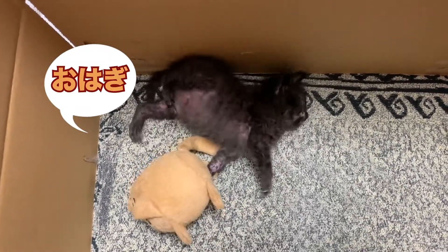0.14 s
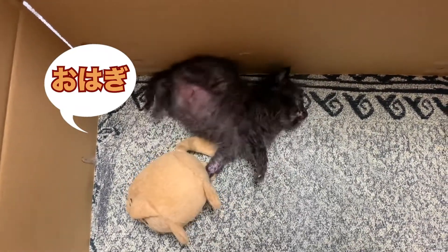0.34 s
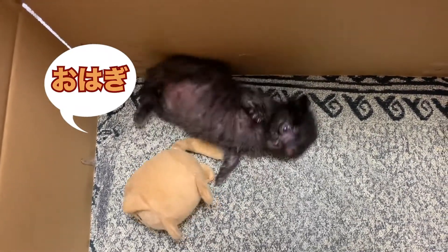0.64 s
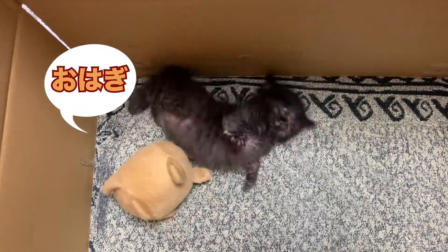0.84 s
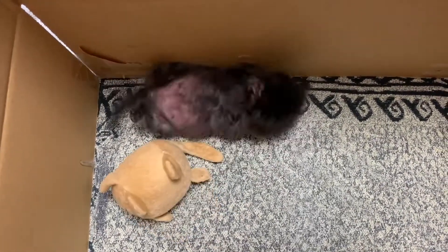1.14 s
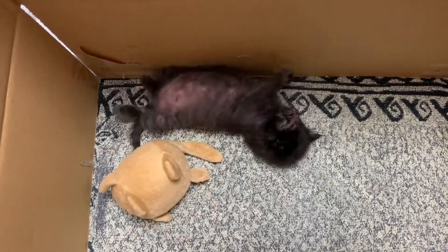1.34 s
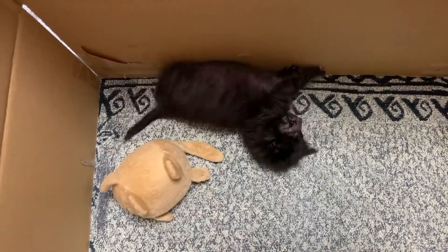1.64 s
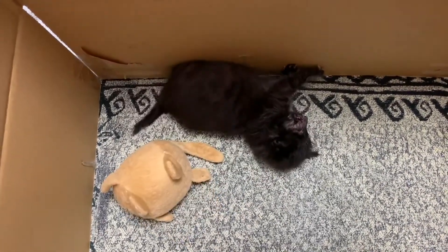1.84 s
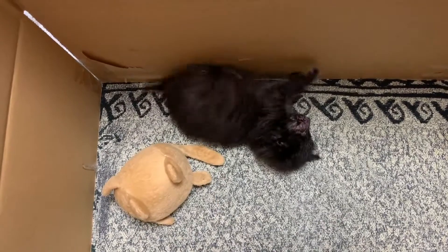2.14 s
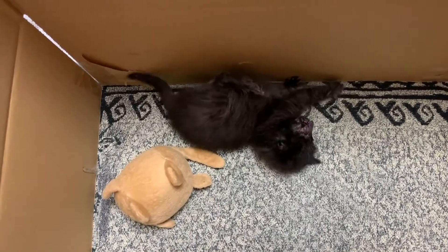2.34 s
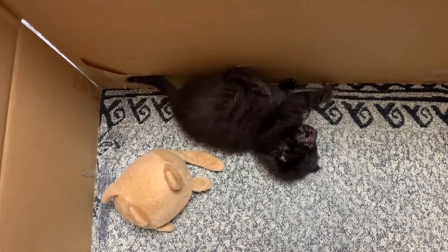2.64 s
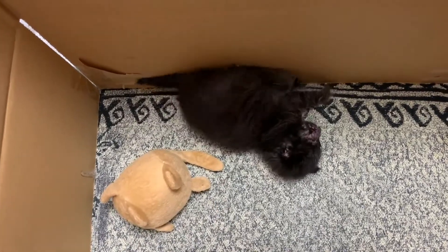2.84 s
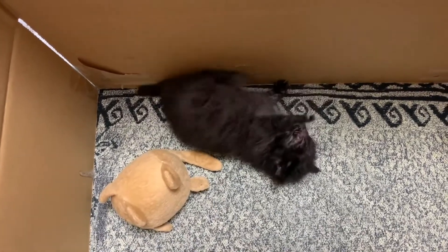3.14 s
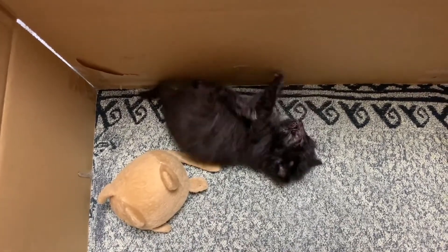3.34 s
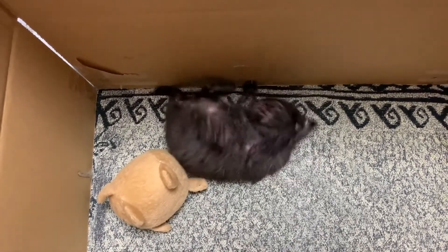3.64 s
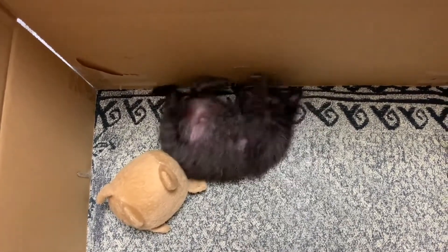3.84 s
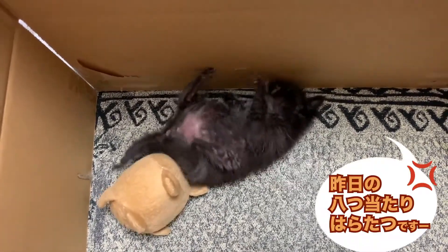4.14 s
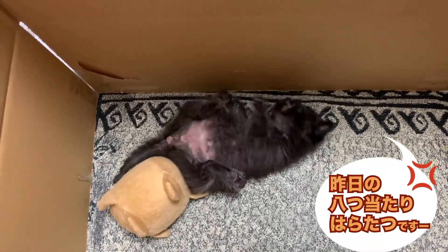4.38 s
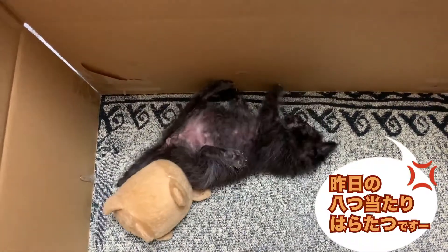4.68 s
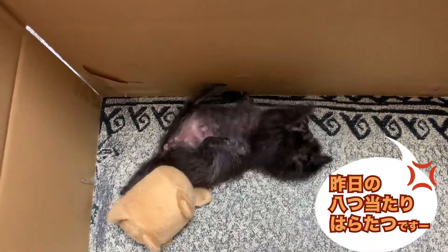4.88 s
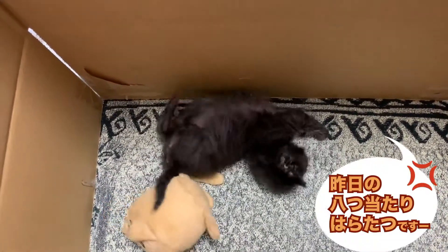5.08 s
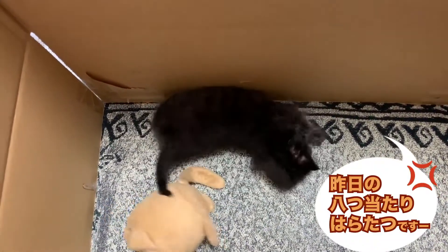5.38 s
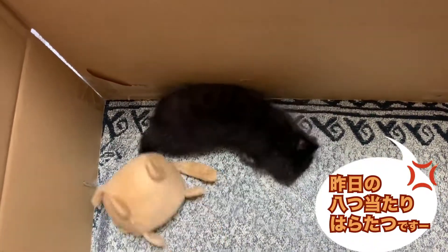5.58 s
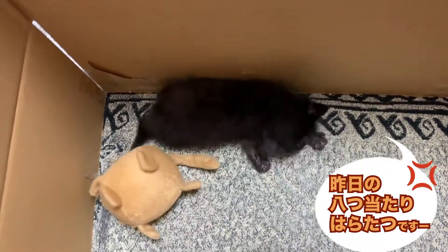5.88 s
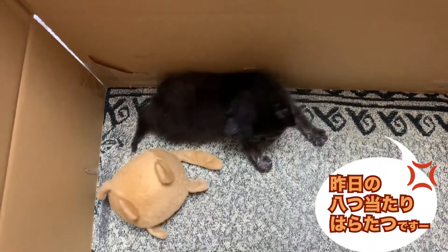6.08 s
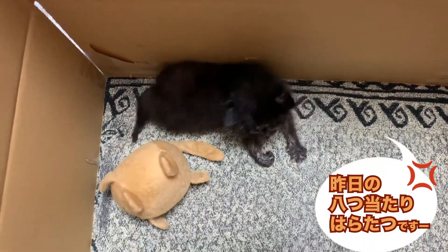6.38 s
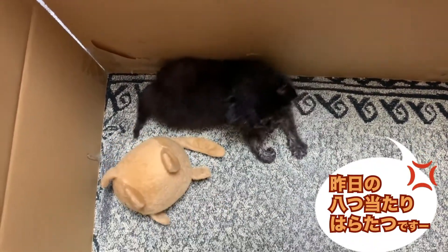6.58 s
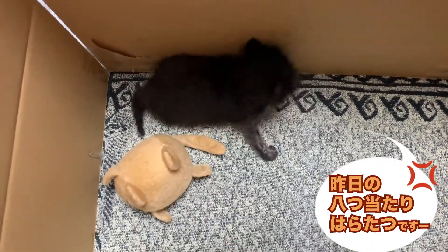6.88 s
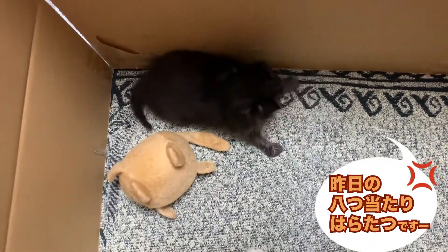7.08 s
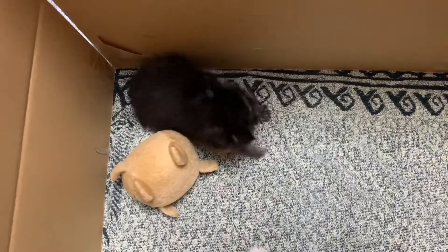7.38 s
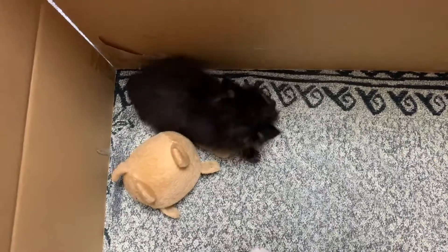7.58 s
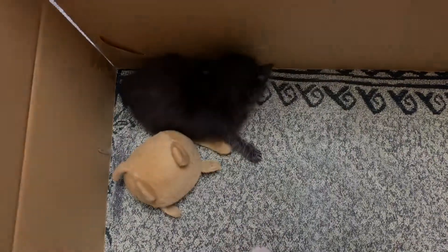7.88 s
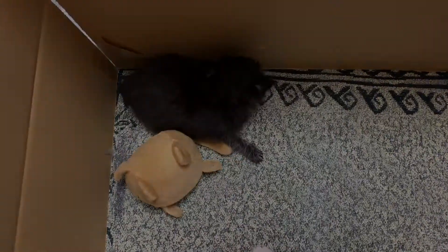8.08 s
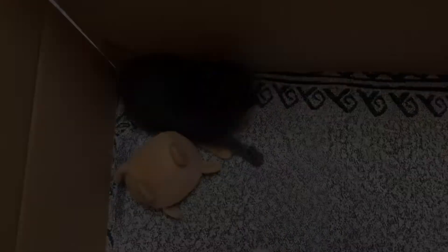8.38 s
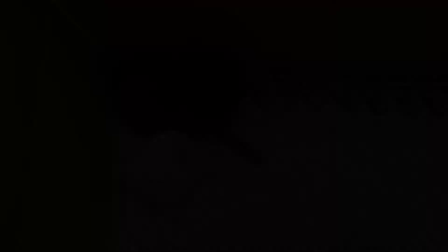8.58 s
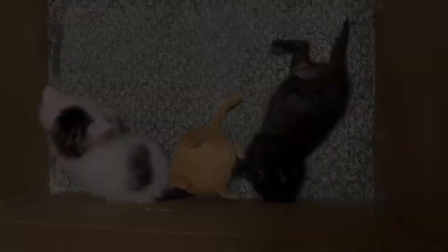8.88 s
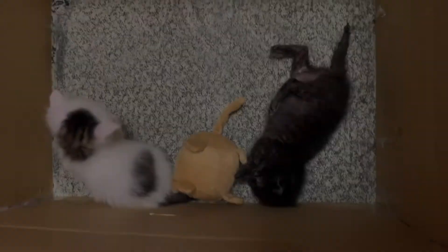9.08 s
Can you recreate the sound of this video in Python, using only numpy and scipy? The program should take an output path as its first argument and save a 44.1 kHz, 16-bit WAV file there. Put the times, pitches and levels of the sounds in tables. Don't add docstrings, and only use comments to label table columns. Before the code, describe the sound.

Two early claw snaps and a cardboard thump lead into rapid scratching and brushing, a pause, then another flurry. A sharp knock follows, then looser rolling rustles, small clicks, papery creaks and one deep floor thud. The movement fades, cuts out for a moment and returns as near-quiet. Heard close from above by a phone, indoors, over low room rumble.

```python
import sys
import numpy as np
from scipy import signal
from scipy.io import wavfile
from scipy.ndimage import uniform_filter1d

SR = 44100
rng = np.random.default_rng(int(sys.argv[2]) if len(sys.argv) > 2 else 0)


def boost_factor(decibels):
    exponent = np.asarray(decibels, float) / 20
    return 10 ** exponent


def to_wav(s):
    ch = np.atleast_2d(s).T
    pcm = np.round(np.clip(ch, -1, 1) * 32767)
    wavfile.write(sys.argv[1], SR, pcm.astype(np.int16))


N = 406643
T = np.arange(N) / SR
HZ = np.arange(513) * SR / 1024
SILENCE_START_S, SILENCE_END_S = 8.659, 8.72

# pitch in Hz, width in Hz, level in dB.
WALL = [(476, 13, -9), (565.3, 40, 8), (838, 170, -5.5), (1170, 22, 1), (1360, 97, -4.5), (1620, 140, -4.5),
        (1774, 220, -3), (2400, 670, -10), (3590, 230, -11)]
# pitch in Hz, width in Hz, level in dB.
PILE = [(3280, 750, -5.5), (4360, 610, -2), (6250, 1290, 0.5), (9100, 1830, -0.5), (11840, 7140, -2.5),
        (14230, 7500, -5)]


def unit(x):
    return x / np.sqrt(np.mean(x ** 2))


def level_curve(table):
    s, db = np.transpose(table)
    return boost_factor(np.interp(T, s, db))


def band(x, lo_hz, hi_hz):
    return signal.sosfilt(signal.butter(2, [lo_hz, hi_hz], "band", fs=SR, output="sos"), x)


def walk(rate):
    hold = int(SR / rate)
    steps = np.repeat(rng.standard_normal(N // hold + 1), hold)
    return 0.98 * uniform_filter1d(steps, hold)[:N]


def resonate(x, modes, patchy_db=None):
    out = 0
    for k, (hz, width, db) in enumerate(modes):
        if patchy_db is not None:
            db = db + patchy_db * walk(17)
        ring = signal.lfilter(*signal.iirpeak(hz, hz / width, fs=SR), x)
        out = out + (-1) ** k * boost_factor(db) * ring
    return out


def add(out, s, sound):
    i = int(s * SR)
    out[i:i + len(sound)] += sound[:N - i]


def rumble():
    # time in seconds, rumble in dB.
    weight = [(0, -58), (.38, -69.5), (.77, -61.5), (1.1, -62), (1.23, -55.5), (1.56, -58), (2.64, -59.5),
              (3.03, -52.5), (3.21, -59.5), (4.55, -61), (4.78, -50), (4.93, -60.5), (5.57, -56),
              (6.06, -62), (6.98, -52.5), (7.45, -59.5), (8.4, -63), (9.22, -61.5)]
    noise = rng.standard_normal((2, N))
    floor = unit(band(band(noise[0], 25, 120), 6.6, 110))
    hum = unit(band(noise[1], 82.3, 105.3))
    return boost_factor(-0.5 + 2.0 * walk(9)) * level_curve(weight) * (floor + boost_factor(-3.5) * hum)


def room():
    # pitch in Hz, level in dB per Hz.
    air_colour = [(150, -8.5), (240, -20), (420, -18), (620, -36.5), (1000, -27), (2000, -42), (4500, -41),
                  (15500, -44)]
    hz, db = np.transpose(air_colour)
    colour = boost_factor(np.interp(np.log(HZ + 1), np.log(hz), db)) * np.clip(HZ / 150, 0, 1) ** 2
    air = signal.fftconvolve(rng.standard_normal(N), signal.firwin2(1023, HZ, colour, fs=SR), "same")
    return boost_factor(-70) * unit(air) * boost_factor(0.27 * walk(15.0))


def strokes(table):
    edge_db, rise_share = 24.5, 0.44
    rise_curve, stop_curve = 1.82, 1.98
    t = T[::44]
    power = boost_factor(-88) ** 2
    for s, length, *db in table:
        rising = t < s
        away = np.where(rising, (s - t) / rise_share, (t - s) / (1 - rise_share)) / length
        firm = boost_factor(-edge_db * np.minimum(away, 5) ** np.where(rising, rise_curve, stop_curve))
        brush = boost_factor(-13.5 - 11 * away)
        shape = firm ** 2 + brush ** 2
        power = power + boost_factor(np.array(db)[:, None]) ** 2 * shape * (t < SILENCE_END_S)
    return [np.interp(T, t, p) for p in np.sqrt(power)]


def slips(spread_db, judder_db, rate):
    uneven_db = spread_db * rng.exponential(size=N)
    return rng.standard_normal(N) * boost_factor(uneven_db + judder_db * walk(rate))


def dragging():
    # middle in seconds, length in seconds, fur on pile in dB, claws on cardboard in dB.
    scrabbles = [(.12, 0.36, -69.5, -66), (.65, 0.78, -71.5, -70), (1.09, 0.26, -65, -66),
                 (1.29, 0.18, -59, -61.5), (1.49, 0.19, -60, -64.5), (1.575, 0.13, -48, -40),
                 (1.6, 0.043, -69, -43.5), (1.71, 0.27, -59, -53), (1.775, 0.095, -42.5, -45),
                 (1.805, 0.063, -48, -40.5), (1.89, 0.075, -53.5, -41.5), (2.06, 0.18, -48.5, -39),
                 (2.12, 0.3, -58, -45), (2.175, 0.079, -52.5, -43), (2.26, 0.058, -50.5, -58),
                 (2.49, 0.17, -70.5, -63.5), (2.71, 0.17, -72, -70.5), (2.8, 0.11, -70.5, -63.5),
                 (2.94, 0.32, -59, -57.5), (3.13, 0.14, -55.5, -59), (3.39, 0.047, -49.5, -42.5),
                 (3.43, 0.097, -56, -55.5), (3.57, 0.33, -58, -59.5), (3.69, 0.1, -51, -55.5),
                 (3.82, 0.53, -67, -66), (3.9, 0.072, -59, -60), (3.948, 0.093, -36.5, -48.5),
                 (3.977, 0.066, -41.5, -51), (4.02, 0.11, -53, -52), (4.085, 0.075, -40.5, -41),
                 (4.12, 0.065, -41.5, -46.5), (4.195, 0.065, -49, -58.5)]
    rolls = [(4.448, .04, -82, -61), (4.497, 0.045, -64, -48.5), (5.536, 0.025, -54, -50),
             (5.681, 0.029, -56, -48), (6.02, 0.042, -49.5, -42), (6.281, .1, -67, -78),
             (6.487, 0.063, -71, -58.5), (4.611, 0.19, -61, -57), (4.714, 0.048, -38, -32.5),
             (4.785, 0.25, -52, -53), (4.855, 0.018, -47, -58), (5.016, 0.22, -49, -58),
             (5.192, 0.25, -67, -64), (5.323, 0.085, -50.5, -60.5), (5.41, 0.49, -63.5, -59.5),
             (5.73, 0.34, -78, -70.5), (6.04, 0.34, -69, -64), (6.328, 0.31, -72, -59.5),
             (6.755, 0.5, -72, -61.5), (6.918, 0.12, -52, -54), (7.021, 0.2, -60, -64),
             (7.11, 0.18, -63, -59.5), (7.246, 0.18, -57, -58), (7.392, 0.15, -69.5, -66.5),
             (7.62, 0.091, -76.5, -99), (7.879, .015, -54, -56.5), (7.909, 0.092, -70, -68),
             (8.034, 0.13, -70, -67.5), (8.231, 0.11, -71, -68), (8.5, 0.54, -70.5, -70)]
    # middle in seconds, length in seconds, shudder in dB.
    leans = [(1.23, 0.13, -50), (1.32, 0.11, -54), (1.53, 0.21, -53), (2.35, 0.3, -59.5),
             (2.88, 0.49, -55.5), (3.14, 0.13, -55), (3.42, 0.12, -49), (4.15, 0.31, -56), (4.6, 0.72, -60),
             (4.77, 0.23, -47), (5.42, .3, -59), (5.74, 0.21, -63), (6.06, 0.36, -60), (6.52, 0.92, -55),
             (6.72, 0.23, -52), (6.93, 0.12, -50.5), (7.29, 0.2, -51.5), (7.45, 0.15, -60),
             (8.1, 0.4, -70.5), (8.5, 0.21, -64)]
    # time in seconds, level in dB.
    sheen = [(0, 5), (1.3, 5.5), (2.05, 0), (2.6, 3), (3.6, 3.5), (4.2, -1), (4.65, -0.5), (5.1, 4.5),
             (5.5, 1.5), (5.72, -6.5), (6.3, -5), (6.78, -9.5), (6.84, 3.5), (7.2, 2.5), (7.5, -4.5),
             (7.84, -5), (7.9, 6), (8.6, 1)]
    fur, claws = strokes(scrabbles + rolls)
    lean = strokes(leans)[0]

    rasp = resonate(slips(spread_db=3.2, judder_db=2.8, rate=130), WALL[2:], patchy_db=2.0)
    fibres = slips(spread_db=1.6, judder_db=2.8, rate=120)
    hiss = resonate(fibres, PILE[:4], patchy_db=3.0)
    hiss = hiss + level_curve(sheen) * resonate(fibres, PILE[4:], patchy_db=2.3)

    shaking = slips(spread_db=2.0, judder_db=5.0, rate=39)
    ring = np.hypot(boost_factor(-27.5) * lean, boost_factor(-13) * claws) * unit(resonate(shaking, WALL[:2]))
    shudder = np.hypot(lean, boost_factor(-3.5) * claws) * unit(band(shaking, 150, 470))
    return boost_factor(-3.0) * claws * unit(rasp) + boost_factor(3.5) * fur * unit(hiss) + boost_factor(-4.5) * shudder + ring


def creaks():
    # start in seconds, end in seconds, pitch in Hz, width in Hz, level in dB.
    rubs = [
        (0.41, 0.47, 920, 77, -60.5),
        (1.4, 1.41, 950, 120, -65.5),
        (2.8, 2.93, 680, 120, -65),
        (6.4, 6.616, 920, 200, -57),
        (5.66, 5.74, 980, 250, -64.5),
        (4.35, 4.907, 820, 230, -66.5),
        (6.603, 6.785, 815, 560, -52.5),
        (8.6, 8.8, 1010, 90, -78),
        (8.8, 9.194, 900, 79, -74),
    ]
    out = 0
    for start, end, hz, width, db in rubs:
        swell = np.sin(np.pi * np.clip((T - start) / (end - start), 0, 1))
        out = out + boost_factor(db) * swell * unit(resonate(rng.standard_normal(N), [(hz, width, 0)]))
    return out


def thumps():
    # start in seconds, peak in dB, wall pitch in Hz, decay in seconds, floorboards in dB.
    pushes = [(0.607, -43, 120, 0.056, -64.5), (1.125, -20.5, 168, 0.085, -39),
              (1.14, -30.5, 74, 0.202, -59), (1.186, -29.5, 239.6, 0.13, -52.5),
              (2.225, -27, 162.4, 0.15, -56), (2.846, -30.5, 76, 0.14, -56), (2.932, -23, 57, 0.046, -46.5),
              (3.045, -33, 59.2, 0.11, -53), (3.05, -42, 289.9, 0.11, -67),
              (3.373, -31.5, 117.7, 0.18, -43.5), (4.694, -17, 249, 0.095, -44),
              (4.718, -35, 200, 0.087, -65), (4.762, -34.5, 230, 0.047, -69), (4.801, -39, 118, 0.068, -60),
              (5.392, -29.5, 63.3, 0.099, -47.5), (5.673, -33.5, 86, 0.093, -56.5),
              (5.776, -39.5, 183, 0.059, -63), (6.012, -37, 160, 0.18, -62), (6.818, -37, 283, 0.14, -56),
              (6.842, -38.5, 182, 0.22, -64), (6.904, -9, 54.6, 0.1, -27), (6.961, -35.5, 48, 0.35, -58),
              (7.852, -39.5, 311, 0.12, -47.5), (7.87, -37.5, 70, 0.16, -65.5),
              (8.41, -46.5, 111, 0.09, -87.5), (8.641, -61, 84.4, 0.15, -101),
              (8.887, -46.5, 101, 0.11, -92.5), (9.077, -37.5, 77.5, 0.078, -64),
              (9.206, -28.5, 158, 0.043, -63.5)]
    board_hz, board_t60_s = 27.3, 0.65
    t = T[:SR]
    sway = np.sin(2 * np.pi * board_hz * t) * boost_factor(5.5 - 60 * t / board_t60_s) * (1 - np.exp(-t / 0.01))
    out = np.zeros(N)
    for s, db, hz, t60, board_db in pushes:
        phase = 2 * np.pi * hz * (t + .0042 * (1 - np.exp(-t / .008)))
        quick = 0.67 * np.sin(1.56 * phase) * boost_factor(-60 * t / t60)
        slow = 0.35 * np.sin(.67 * phase) * boost_factor(25 * t / t60)
        fade = boost_factor(db - 2.0 - 60 * t / t60)
        soft_start = np.minimum(t * hz / 0.5, 1) ** 1.34
        panel = (np.sin(phase) + quick + slow) * fade * soft_start
        add(out, s - 0.001, panel + boost_factor(board_db) * sway)
    return out


def tear(t, t60_s, tail_db):
    after = np.maximum(t, 0)
    snap = 0.27 * np.exp(-np.abs(t - .0015) / 0.0015)
    return boost_factor(-60 * after / t60_s) + boost_factor(tail_db - 60 * after / 0.14) + snap


def ticks():
    # time in seconds, # peak in
    # dB, treble in dB against the peak, wall in dB against the peak, loudest ring in Hz.
    catches = [(1.123, -42.5, -29, 14, 1260), (1.179, -14, -7.5, -6, 1273), (1.188, -17, -27, -15, 1470),
               (1.554, -34, -1, -9, 2250), (2.223, -28, -28, 10, 1870), (2.322, -50.5, -2, -29, 2000),
               (2.381, -48, -6, -13, 1790), (2.513, -46, -30, -30, 2650), (2.559, -38.5, -35, -29, 3280),
               (2.661, -47, -15, -32, 2670), (3.044, -39.5, -13, 5, 1920), (3.153, -52, -5, -18, 1740),
               (3.372, -22, -10, 7.5, 1200), (3.677, -32.5, -14, -36, 3500), (3.29, -65.5, -12, 12, 1900),
               (4.176, -49, 4, -10, 3300), (4.073, -36.5, 2.5, -3, 1620), (4.395, -56, -20, -10, 1900),
               (4.49, -41.5, -18, -8, 1430), (4.564, -50.5, 7.5, -16, 1360), (4.693, -20.5, -8, 1.5, 1170),
               (4.851, -45, 2, -34, 1360), (5.398, -45.5, 8, -11, 1900), (5.526, -44, 2, -9, 2010),
               (5.678, -25, 0, -14, 4140), (5.772, -54, -18, 5, 1020)]
    later_catches = [(5.955, -44.5, -15, -21, 1900), (5.969, -41.5, 9, -11, 2970),
                     (6.012, -18.5, -1.5, -11.5, 1510), (6.127, -35.5, -2, -31, 2240),
                     (6.354, -30.5, -5, -22, 1170), (6.412, -23.5, -10.5, -33, 1170),
                     (6.417, -30.5, -17, -19, 1086), (6.428, -36, -26, -4, 1120), (6.451, -25, -7, -23, 2230),
                     (6.456, -22.5, -19, -20, 890), (6.467, -26, -3.5, -11, 1790),
                     (6.602, -30.5, -13, -6.5, 880), (6.69, -47, -6, -12, 2400), (6.725, -44, -12, -5, 1000),
                     (6.898, -42, -8, -3, 1300), (6.816, -41.5, 11, 8.5, 890), (6.839, -46, 7, 14, 1650),
                     (6.907, -36.5, -1.5, 3, 920), (7.056, -53.5, 8.5, 4, 1750), (7.364, -63, 10.5, -5, 1500),
                     (7.853, -35, 3.5, 1.5, 1760), (8.407, -50.5, -24, 8, 960), (8.475, -43, -11, 1.5, 2740),
                     (8.738, -65, -3, -20, 3300), (8.81, -55, -26, -11, 1505), (8.852, -55, -29, -17, 1290),
                     (8.892, -56, -32, -6, 1490), (8.935, -60, -28, 6, 1440), (9.069, -66, -1.5, -10, 1210),
                     (9.173, -65.5, -11, -20, 3500), (9.204, -54.5, -5.5, 24.5, 810)]
    lead_s = .006
    t = T[:SR // 7] - lead_s
    strain = np.where(t < 0, boost_factor(-21 + 2200 * t), np.minimum(0.3 + t / .001, 1))
    out = np.zeros(N)
    for s, db, treble_db, wall_db, hz in catches + later_catches:
        t60 = 0.23 * boost_factor(0.72 * wall_db + 1.14 * db)
        noise = rng.standard_normal((4, len(t)))
        ragged = boost_factor(3.6 * uniform_filter1d(noise[3], size=40) * np.sqrt(40))
        body, treble, low = noise[:3] * ragged * strain
        body = body * tear(t, 2.3 * t60, tail_db=-20.5)
        treble = treble * tear(t, 0.8 * t60, tail_db=-28)
        low = low * tear(t, 1.2 * t60, tail_db=-18)

        ring = boost_factor(9.5) * resonate(body, [(hz, hz / 4, 0)])
        knock = resonate(body, WALL[3:]) + boost_factor(-3.5) * band(body, 890, 2240) + ring
        snap = resonate(treble, PILE[:4]) + boost_factor(0.5) * resonate(treble, PILE[4:])
        wall = band(band(low, 350, 700), 170, 740)
        for part, part_db in ((knock, -2.0), (snap, treble_db + 4.5), (wall, wall_db - 9.5)):
            add(out, s - lead_s, boost_factor(db + part_db) * part / np.abs(part).max())
    return out


def ports(x):
    # pitch in Hz, radians the left port leads, radians it wanders as the source moves.
    port_lead = [(0, 0, 0), (450, -.4, .1), (600, -.2, .4), (720, 2.1, .95), (1050, 1.9, .95),
                 (1250, .4, .6), (2000, .1, .45), (2700, .3, 1), (3100, 1.5, 1), (3800, .8, .6),
                 (5300, 3.14, .45), (7000, 4.85, .1), (22050, 19.8, .1)]
    cells = signal.stft(x, nperseg=1024, noverlap=768)[2]
    hz, lead, wander = np.transpose(port_lead)
    pitch = HZ[:, None]
    high = pitch > 4500
    patches = rng.standard_normal(cells.shape)
    patches = unit(uniform_filter1d(uniform_filter1d(patches, size=6, axis=0), size=16, axis=1))

    treble = np.sum(np.abs(cells[100:]) ** 2, axis=0)
    usual = uniform_filter1d(treble, size=24)
    click = np.clip(treble / usual - 1.6, 0, 1)
    shift = click * np.clip(pitch / 5000 - .4, 0, 1) * np.tanh(3 * patches[200])

    hush = .8 * (treble < np.quantile(treble, .15))
    after_cut = 0.45 * (np.arange(len(treble)) * 256 > SILENCE_END_S * SR)
    stray = np.interp(HZ, hz, wander)[:, None] + (hush + after_cut) * high
    stray = stray * np.where(pitch > 2500, 1 - click, 1)
    half = (np.interp(HZ, hz, lead)[:, None] + shift + stray * patches) / 2

    power = uniform_filter1d(uniform_filter1d(np.abs(cells) ** 2, size=24, axis=0), size=5, axis=1)
    cells = cells * ((pitch < 11500) | (power > boost_factor(-108) ** 2))
    top_db = np.where(treble > 3.5 * usual, -27, -41)
    cells = cells * np.where(pitch > 15750, boost_factor(top_db), 1)

    def drop_faint(gain):
        faint = (np.abs(gain) < .24) & high & (click < .5)
        return np.where(faint, boost_factor(-26.0) * gain, gain)

    mid = cells * drop_faint(np.cos(half))
    side = 1j * cells * drop_faint(np.sin(half))
    return signal.istft(np.array([mid + side, mid - side]), nperseg=1024, noverlap=768)[1][:, :N]


def scene():
    return ports(rumble() + room() + dragging() + creaks() + thumps() + ticks())


def roll_off(x):
    return signal.sosfilt(signal.butter(12, 16820, fs=SR, output="sos"), x)


def record(dry):
    outside = np.maximum(SILENCE_START_S - T, T - SILENCE_END_S)
    return roll_off(dry * np.clip(outside / 0.001, 0, 1))


dry = scene()
out = record(dry)
to_wav(out)
```